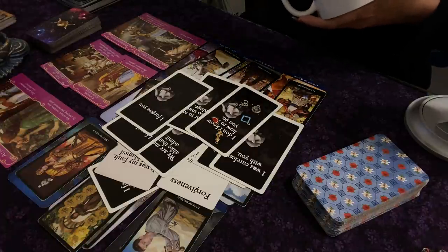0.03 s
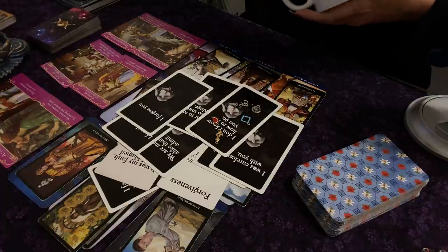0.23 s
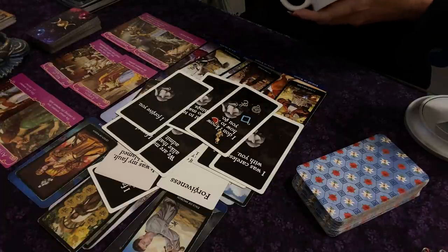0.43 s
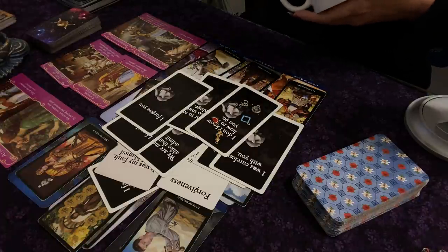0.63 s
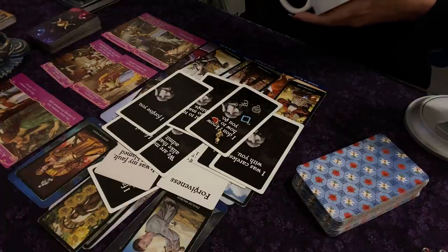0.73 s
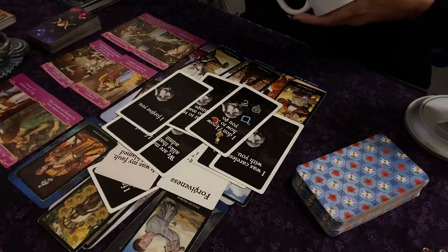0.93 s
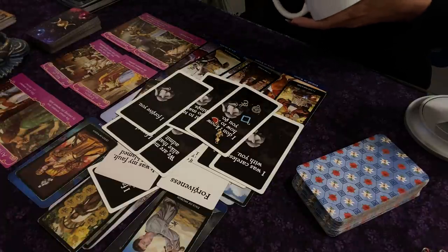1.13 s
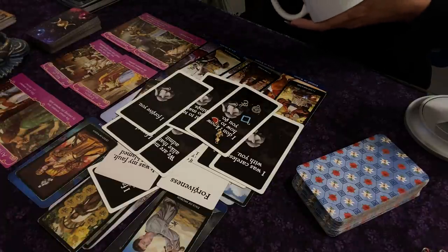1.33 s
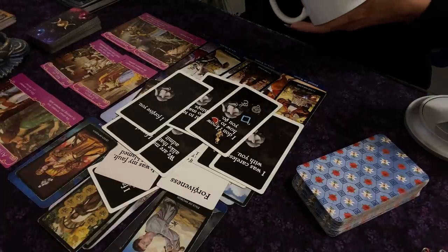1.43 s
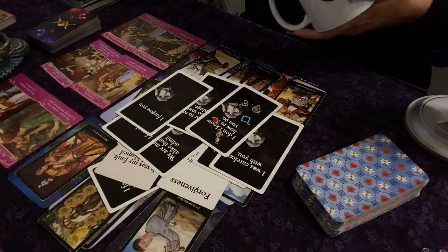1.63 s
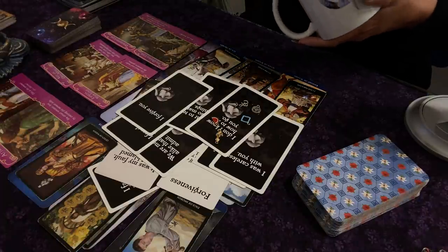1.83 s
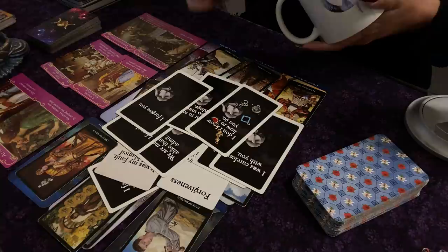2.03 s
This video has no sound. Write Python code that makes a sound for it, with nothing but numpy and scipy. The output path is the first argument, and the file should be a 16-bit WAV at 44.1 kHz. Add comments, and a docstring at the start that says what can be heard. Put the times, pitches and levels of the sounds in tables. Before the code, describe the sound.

Close up in a quiet indoor room, tiny metal pieces tap, then jingle densely against a ceramic mug in quick surges, thin out into single clinks and hollow knocks, make one last drop, and fall nearly silent.

```python
"""Small metal charms are swirled in a hand-held ceramic mug in a quiet room.
First come a few taps, then three surges of dense rattling, with dull knocks on the base later on.
Then single clinks as the charms settle, one last drop, a few very faint clinks and a soft thud of the hands.
Clinks and rattling are short bright noise cracks with fading ringing tones of mug and charms;
a low hollow tone is the air in the mug, and rumble, hiss and hum lie under it all."""
import sys
import numpy as np
from scipy import signal
from scipy.fft import irfft
from scipy.io import wavfile

SR = 44100
rng = np.random.default_rng(int(sys.argv[2]) if len(sys.argv) > 2 else 0)


def file_out(sig):
    """Save sig as 16-bit WAV at sys.argv[1]."""
    # one column per channel
    cols = np.atleast_2d(sig).T
    # limit, then scale
    lim = np.clip(cols, -1, 1)
    pcm = np.round(lim * 32767).astype(np.int16)
    wavfile.write(sys.argv[1], SR, pcm)


N = 91904
TIME = np.arange(N) / SR
RING_TIME = TIME[:SR // 5]  # each single sound lasts at most 0.2 s


def amp(db):
    """Turn decibels into a gain."""
    return 10 ** (np.asarray(db) / 20)


def dying(t, t60):
    """Fading envelope that loses 60 dB in t60 seconds."""
    return np.exp(-np.log(1000) * t / t60)


def bell(t, centre, width):
    """Smooth bell-shaped rise and fall, highest at the centre."""
    return np.exp(-.5 * ((t - centre) / width) ** 2)


def convolve(x, response):
    """Start a copy of the response at every pulse or sample of x."""
    return signal.fftconvolve(x, response)[:N]


def coloured(spectrum, size):
    """Noise with the given spectrum and random phases, scaled to rms 1."""
    hz, db = np.transpose(spectrum)
    grid = np.maximum(np.fft.rfftfreq(size, 1 / SR), 1)
    level = amp(np.interp(np.log(grid), np.log(hz), db))
    phase = np.exp(2j * np.pi * rng.random(len(grid)))
    noise = irfft(phase * level, size)
    return noise / noise.std()


def low_pass(x, hz):
    """Gently take away the treble above hz."""
    return signal.lfilter(*signal.butter(2, hz, fs=SR), x)


# colour of the quiet room's noise: f/Hz, level/dB (relative)
BACKGROUND_COLOUR = [(15, -30.5), (25, -4.5), (52, -8.5), (92, -22), (123, -12.5), (149, -25.5), (217, -26),
                     (476, -31), (796, -36.5), (2350, -42.5), (4870, -42.5), (16000, -47.5)]
BACKGROUND_DB, HUM_HZ, HUM_DB = -54, 121.6, -69


def background():
    """Low room rumble and faint hiss as coloured noise, and mains hum as a steady sine."""
    noise = amp(BACKGROUND_DB) * coloured(BACKGROUND_COLOUR, size=N)
    hum = np.sqrt(2) * np.sin(2 * np.pi * HUM_HZ * TIME)  # rms 1
    return noise + amp(HUM_DB) * hum


ROOM_DB, ROOM_T60_S, ROOM_DELAY_S = -9.5, 0.23, 0.0057
ROOM_LOW_DB, ROOM_LOW_T60_S, ROOM_LOW_HZ = -9.5, 0.2, 1130


def room_tail(t60):
    """Many random reflections as fading noise after a short delay, scaled to energy 1."""
    t = TIME[:SR // 2]
    tail = rng.standard_normal(len(t)) * dying(t, t60) * (t > ROOM_DELAY_S)
    return tail / np.linalg.norm(tail)


def room(x):
    """Short diffuse echo of a furnished room: a full-range tail plus a second one for the lows."""
    full = room_tail(ROOM_T60_S)
    low = low_pass(room_tail(ROOM_LOW_T60_S), ROOM_LOW_HZ)
    return convolve(x, amp(ROOM_DB) * full + amp(ROOM_LOW_DB) * low)


# dull bumps of the hands on the mug: t/s, level/dB
BUMPS = [(0.328, -46), (.58, -37.5), (1.828, -41.5)]
BUMP_HZ, BUMP_S = 36.7, 0.028


def bumps():
    """Soft, very low handling thuds: a deep sine that swells and fades quickly."""
    out = np.zeros(N)
    for s, db in BUMPS:
        since = TIME - s
        out += amp(db) * np.exp(-(since / BUMP_S) ** 2) * np.sin(2 * np.pi * BUMP_HZ * since)
    return out


# pitch of the air in the mug as it tilts: t/s, f/Hz, scatter from touch to touch (share of the pitch)
AIR_PITCH = [(0, 763, 0), (.16, 750, 0.035), (.28, 688.6, .06), (.37, 714, 0.075), (.62, 662, 0.034),
             (.8, 624.6, 0), (1.15, 657.6, 0.021), (1.5, 688, 0.023)]
AIR_T60_S, HOLLOW_DB = 0.075, -3
CLINK_AIR_DB, KNOCK_AIR_DB = -10, 15  # added to the level of each clink or knock


def mug_air():
    """Touches, clinks and knocks push the air in the mug; its hollow tone shifts with tilt and scatters."""
    pushes = amp(HOLLOW_DB) * contacts(3)
    for rows, air_db in ((CLINKS, CLINK_AIR_DB), (KNOCKS, KNOCK_AIR_DB)):
        for s, db, *_ in rows:
            pushes[int(s * SR)] += amp(db + air_db)
    s, hz, scatter = np.transpose(AIR_PITCH)
    wander = np.interp(TIME, s, scatter) * rng.standard_normal(N)
    pitch = np.interp(TIME, s, hz) * (1 + wander)
    envelope = dying(RING_TIME, AIR_T60_S)
    envelope *= np.sqrt(2) / np.linalg.norm(envelope)  # each full tone has energy near 1
    out = np.zeros(N + SR)
    for i in np.flatnonzero(pushes):
        tone = envelope * np.cos(2 * np.pi * pitch[i] * RING_TIME)
        out[i:i + len(RING_TIME)] += pushes[i] * tone
    return out[:N]


# charms knock on the base of the mug: t/s, level/dB (relative)
KNOCKS = [(.924, -38), (1.061, -35.5), (1.145, -34.5), (1.257, -36), (1.294, -31), (1.318, -30.5),
          (1.4638, -23), (1.522, -38)]
# colour of a knock: f/Hz, level/dB (relative)
KNOCK_COLOUR = [(150, -18), (380, -5), (620, -1.5), (1100, -7.5), (2000, -3), (5000, -31)]
KNOCK_T60_S, KNOCK_DB = 0.034, -9  # the level is added to that of each knock


def knocks():
    """Dull contacts with the thick base: short bursts of fading, coloured noise."""
    out = np.zeros(N + SR)
    for s, db in KNOCKS:
        start = int(s * SR)
        thud = dying(RING_TIME, KNOCK_T60_S) * coloured(KNOCK_COLOUR, size=len(RING_TIME))
        out[start:start + len(thud)] += amp(db + KNOCK_DB) * thud
    return out[:N]


# average colour of the crack of a contact, before random changes: f/Hz, level/dB (relative)
CRACK_COLOUR = [(100, -36), (280, -29), (450, -7), (680, -4), (1050, -11), (1600, -8.5), (2400, -6.5),
                (3000, -4), (4400, -4.5), (6400, 0.5), (8000, 4.5), (10000, 4), (12500, -3.5), (15500, -2)]
SNAP_DB, SNAP_T60_S = -15, 0.0042
REFLECTIONS_DB, REFLECTIONS_T60_S = -13, 0.038
COLOUR_DB = 2  # size of the random changes


def crack():
    """A sharp snap and its dense reflections inside the mug, as noise in a colour of its own."""
    snap = amp(SNAP_DB) * dying(RING_TIME, SNAP_T60_S)
    reflections = amp(REFLECTIONS_DB) * dying(RING_TIME, REFLECTIONS_T60_S)
    colour = [(hz, db + COLOUR_DB * rng.uniform(-0.093, 1)) for hz, db in CRACK_COLOUR]
    return (snap + reflections) * coloured(colour, size=len(RING_TIME))


# tones of the mug wall, damped by the hand, before random changes: f/Hz, level/dB, t60/s
MUG = [(1874, -38, 0.04), (2292, -19, 0.061), (2370, -20, 0.055), (2442, -19, 0.042), (2557, -23.5, 0.032),
       (3785, -40.5, 0.17), (6200, -20.5, 0.044), (6490, -25, 0.033), (6560, -22, 0.067), (6740, -18, 0.05),
       (15520, -29, 0.067)]
MODE_SPREAD_DB, WALL_DETUNE_HZ = 4.5, 16


def mug_wall():
    """The wall's fading tones; strength and pitch vary with the spot hit and the charms lying on it."""
    out = np.zeros(len(RING_TIME))
    for hz, db, t60 in MUG:
        level = amp(db + MODE_SPREAD_DB * rng.uniform(-1.1, 1))
        pitch = hz + WALL_DETUNE_HZ * rng.standard_normal()
        tone = np.sin(2 * np.pi * pitch * RING_TIME) * dying(RING_TIME, t60)
        out += level * tone * rng.choice([-1, 1])
    return out


def ping(hz, t60, detune, count=3):
    """A ping of mug or charm: a few close tones that start together and beat, never quite the same."""
    pitches = hz * (1 + detune * rng.uniform(-1.05, 1, (count, 1)))
    return np.sin(2 * np.pi * pitches * RING_TIME).mean(axis=0) * dying(RING_TIME, t60)


# the swirl, levels relative: t/s, charms on the wall level/dB, charms on each other level/dB,
# hollow air tone level/dB
SWIRL = [(0, -67, -70, -49.5), (0.169, -57, -70.5, -51.5), (0.178, -32.5, -47, -48),
         (0.194, -35.5, -42, -49), (0.268, -27, -22.5, -31.5), (0.342, -22.5, -16, -36),
         (0.426, -27, -30.5, -39), (0.572, -21, -17, -36.5), (0.648, -34, -51, -46),
         (0.684, -24.5, -25.5, -28), (0.71, -36, -34.5, -50), (0.732, -25, -19.5, -38),
         (0.762, -28.5, -25, -30.5), (0.79, -25, -24.5, -49), (0.83, -34, -36.5, -40),
         (0.898, -29.5, -26.5, -35), (0.922, -32.5, -41.5, -36.5), (0.944, -55, -49, -52),
         (0.99, -35.5, -32, -39.5), (1.114, -48, -43.5, -44.5), (1.17, -58, -71, -53)]
CONTACTS_PER_S = 400
SIZE_SPREAD_DB, EVEN_S = 2.5, .008


def contacts(column):
    """Random touches of uneven size whose running level follows one column of the swirl."""
    swirl = np.array(SWIRL)
    born = rng.random(N) < CONTACTS_PER_S / SR
    clicks = born * amp(SIZE_SPREAD_DB * rng.standard_normal(N)) * rng.choice([-1, 1], N)
    window = bell(RING_TIME, RING_TIME.mean(), EVEN_S / 2)
    power = signal.fftconvolve(clicks ** 2, window / window.sum(), "same")
    # silent before the first row and after the last
    level = np.interp(TIME, swirl[:, 0], swirl[:, column], left=-np.inf, right=-np.inf)
    return clicks / np.sqrt(np.abs(power) + 1e-9) * amp(level)


# ringing tones of mug and charms, each used most around its own moment:
# f/Hz, level/dB (relative), t60/s, used most at t/s
PINGS = [(1915, -16.5, .07, .72), (5222, -7, 0.095, .33), (6210, -3, 0.022, .58), (6660, -1.5, 0.11, .35),
         (8040, -3, 0.046, .4), (9080, -11, .1, .9), (9320, -7, 0.052, .5), (9540, -3, .07, .76),
         (10480, -4, .06, .54), (10550, -6, 0.063, .72), (11310, -9, 0.093, .31), (12230, -7, 0.086, 0.25)]
WALL_DB, WALL_CRACK_DB = -11.5, -1.5
JINGLE_DB, JINGLE_WALL_DB = -16, -10
BUSY_S, PING_DETUNE = .24, .008  # detuning is a share of the pitch


def rattle(count=2):
    """Swirled charms skip along the wall and jingle together; the pings take turns, count kinds of each."""
    wall = amp(WALL_DB) * contacts(1)
    jingle = amp(JINGLE_DB) * contacts(2)
    # deal every touch to one ping, most likely one that is busy then
    busy = [bell(TIME, busiest, BUSY_S) for *_, busiest in PINGS]
    chance = np.cumsum(busy, axis=0)
    dealt = np.sum(chance < rng.random(N) * chance[-1], axis=0)
    way = rng.integers(0, count, N)
    out = np.zeros(N)
    for k, (hz, db, t60, _) in enumerate(PINGS):
        for j in range(count):
            mine = (dealt == k) & (way == j)
            wall_hit = mug_wall() + amp(WALL_CRACK_DB) * crack()
            jingle_hit = crack() + amp(db) * ping(hz, t60, PING_DETUNE)
            jingle_hit += amp(JINGLE_WALL_DB) * mug_wall()
            out += convolve(wall * mine, wall_hit) + convolve(jingle * mine, jingle_hit)
    return out


CHATTER_GAP_S, CHATTER_DB, CHATTER_JITTER = .0022, -6.5, 0.46  # typical gap, level, unevenness of gaps


def chatter(length_s, count=16):
    """A first touch, then a fading run of quick, uneven rebounds."""
    gaps = CHATTER_GAP_S * np.exp(CHATTER_JITTER * rng.uniform(-1, 1, count))
    after = np.cumsum(gaps)
    touches = np.zeros(len(RING_TIME))
    places = np.minimum(after * SR, len(touches) - 1).astype(int)
    fade = np.exp(-(after / length_s) ** 2)
    touches[places] = amp(CHATTER_DB) * rng.standard_normal(count) * fade
    touches[0] = 1
    return touches


# a ping lasts longer and ends up purer as the heap loosens: t/s, t60/s, detuning (share of the pitch)
PING_DAMPING = [(.11, 0.021, .01), (.3, 0.031, 0.011), (1.04, 0.056, .001)]
# single clinks: t/s, level/dB, mug wall level/dB, main ping f/Hz, ping level/dB,
# brightness (treble cut) f/Hz, fading time of the chatter/s
CLINKS = [(.0005, -27, -3, 6700, -33, 8400, 0.016), (0.04, -30.5, -2, 8040, -31, 12000, 0.0021),
          (.076, -16, 1.5, 6200, -1, 7000, 0.0034), (.0912, -16.5, 0, 5240, -8, 7550, 0.0018),
          (.105, -23.5, -8.5, 6680, -2, 9000, .003), (.136, -24, -2, 9650, -16, 12900, .012),
          (.1775, -29, 9.5, 12230, -16, 14000, 0.0073), (.186, -25, -11, 12230, -6, 17000, .004),
          (0.198, -19.5, -8, 10700, -8, 16000, 0.0036), (.209, -21, -1, 10580, -11, 16000, 0.0066),
          (.243, -9, 0, 10500, -6, 16800, .004), (.284, -20, -3, 8040, 4, 17000, 0.013),
          (.303, -10, -1.5, 6660, -5, 16000, 0.02), (.3195, -11, -4, 8040, -2, 17000, 0.021),
          (.341, -12.5, 9, 10500, -8, 17000, 0.0044), (.364, -15.5, 7.5, 6660, -9, 16000, .008),
          (.391, -26, -14, 6660, 10, 14000, 0.0023), (.452, -17, 1, 8040, -5, 16000, .003),
          (.487, -8.5, -6, 10500, -10, 16000, 0.01), (.536, -9.5, 3.5, 6210, -3, 15800, 0.0056),
          (.573, -13, 7.5, 10500, -18, 16000, 0.0077), (0.7174, -15.5, 0.5, 10300, -2, 16100, 0.018),
          (.7495, -19.5, -18, 9480, 4, 16000, 0.002), (.785, -6.5, -13, 9530, -5.5, 16000, 0.0021),
          (.863, -16, -23, 8040, -7, 16000, 0.0022), (0.921, -16, -8, 2490, -7.5, 12000, 0.0016),
          (0.9562, -20.5, -4, 9530, -18, 16000, 0.0016), (.984, -20.5, -4, 10800, -19, 16000, 0.0017),
          (.9945, -14, -3.5, 9450, -12.5, 16200, 0.0021), (1.02, -15.5, -10, 9080, -17, 16000, 0.0027),
          (1.045, -39, -8, 11750, 6, 15800, 0.01), (1.06, -17.5, 1, 11750, -6, 16000, 0.0018),
          (1.079, -29, 6.5, 11900, -0.5, 16000, 0.026), (1.106, -18.5, -1, 11800, -11.5, 16100, 0.011),
          (1.137, -35, -1, 10580, -21, 13000, 0.02), (1.1874, -26.5, 2, 11970, -15, 15000, 0.013),
          (1.2455, -21.5, 1.5, 9080, -21, 16000, 0.0053), (1.256, -23, -6, 9080, -23, 16000, 0.0019),
          (1.270, -23, 3.5, 12230, -2.5, 18000, 0.0027), (1.2934, -24.5, 7, 6600, -8, 15000, 0.0058),
          (1.302, -20, -9, 6590, -13, 16000, 0.034), (1.318, -15, 1.5, 6680, -8.5, 14600, 0.0039),
          (1.327, -25, 0, 6680, -16, 16100, 0.018), (1.339, -36, -7, 6920, -12, 15100, 0.024),
          (1.4643, -15.5, -2, 6680, -2.5, 15700, 0.0069), (1.474, -28, 3, 6200, -1, 17000, 0.035),
          (1.526, -36.5, 3, 2310, -13, 13800, 0.038), (1.597, -42, 3, 6756, -3, 9140, .003),
          (1.649, -42, 2, 5330, -13, 8420, 0.003), (1.689, -46, -5, 8040, -14, 13780, .002)]


def clinks():
    """Single charms drop onto the mug and rebound: crack, wall and ping, each with its own treble cut."""
    out = np.zeros(N + SR)
    when, t60, detune = np.transpose(PING_DAMPING)
    for s, db, mug_db, ping_hz, ping_db, bright_hz, chatter_s in CLINKS:
        touches = chatter(chatter_s)
        impact = crack() + amp(mug_db) * mug_wall()
        hit = convolve(touches, impact)[:len(RING_TIME)]
        main_ping = ping(ping_hz, np.interp(s, when, t60), np.interp(s, when, detune))
        hit = low_pass(hit + amp(ping_db) * main_ping, bright_hz)
        start = int(s * SR)
        out[start:start + len(hit)] += amp(db) * hit
    return out[:N]


RADIATES_ABOVE_HZ = 230


def scene():
    """The mug and its charms in the room; so small a body gives off little bass."""
    mug = rattle() + clinks() + knocks() + mug_air()
    mug = signal.lfilter(*signal.butter(2, RADIATES_ABOVE_HZ, "high", fs=SR), mug)
    return (mug + room(mug) + bumps() + background())[None]


CUTOFF_HZ = 15750


def record(dry):
    """Cut the top steeply with an elliptic low-pass."""
    steep = signal.ellip(12, .1, 90, CUTOFF_HZ, fs=SR, output="sos")
    return signal.sosfilt(steep, dry)


dry = scene()
out = record(dry)
file_out(out)
```